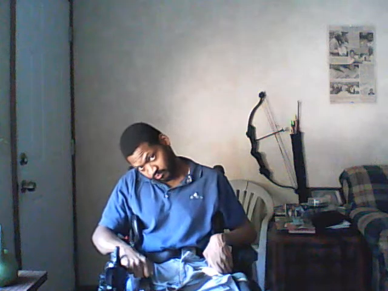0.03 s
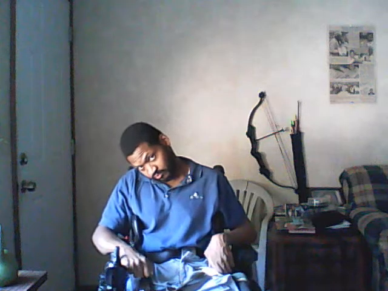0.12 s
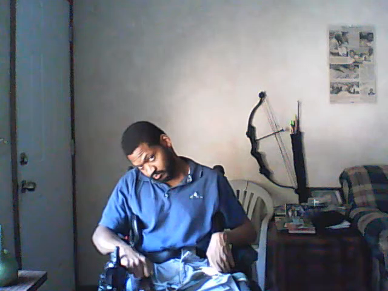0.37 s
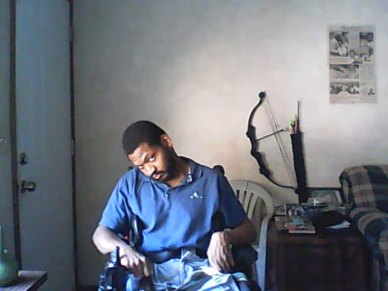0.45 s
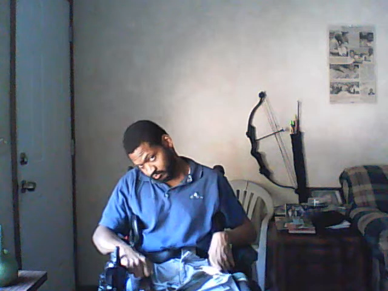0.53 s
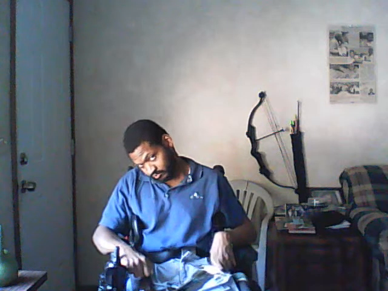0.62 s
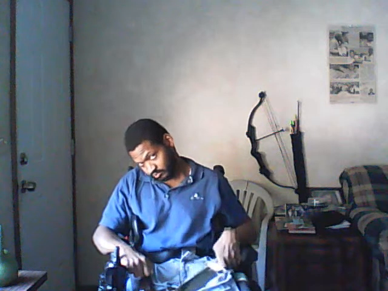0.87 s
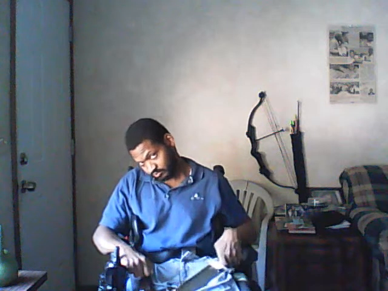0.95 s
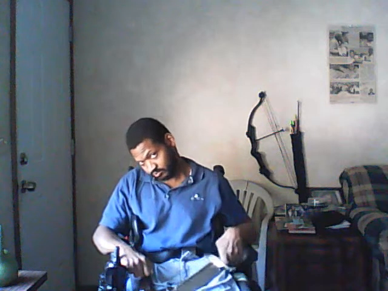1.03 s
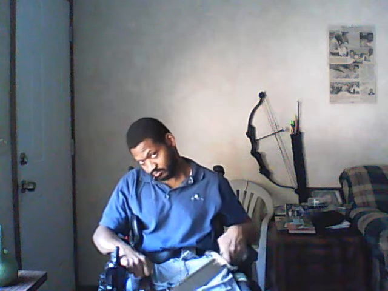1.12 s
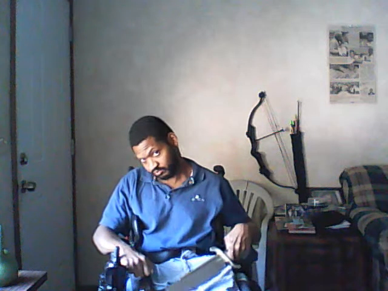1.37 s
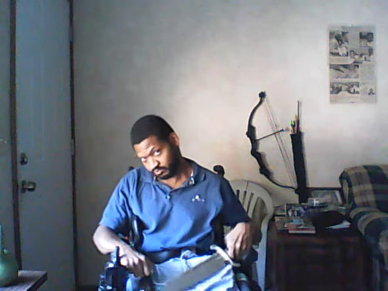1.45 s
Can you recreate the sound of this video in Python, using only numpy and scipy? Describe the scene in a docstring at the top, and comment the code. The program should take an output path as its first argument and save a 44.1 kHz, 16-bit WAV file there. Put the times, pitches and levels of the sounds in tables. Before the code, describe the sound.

Electric wheelchair drive motor sings one short steady whine, then a lower, fainter hum, amid dull bumps

```python
"""A power wheelchair is nudged in a quiet living room, heard on a cheap webcam microphone.
Room air, microphone hiss and thin wavering tones, all shaped noise, lie under everything.
Soft frame thuds (decaying sines) start first and recur over a low rumble of resonant noise.
Then one drive motor sings a near-pure commutator tone that swells and fades, with rumbling gears;
a second motor, made the same way, hums lower and fainter to the end."""
import sys
import numpy as np
from scipy import signal
from scipy.fft import rfft, irfft
from scipy.io import wavfile

SR = 44100
rng = np.random.default_rng(int(sys.argv[2]) if len(sys.argv) > 2 else 0)


def master_out(mix):
    """Clip the mix to full scale and print it as 16-bit PCM to the path in sys.argv[1]."""
    frames = np.transpose(np.atleast_2d(mix))
    ceiling = np.clip(frames, -1, 1)
    pcm = np.round(ceiling * 32767).astype(np.int16)
    wavfile.write(sys.argv[1], SR, pcm)


def makeup_ratio(level_db):
    """Linear amplitude ratio for a level in decibels (20 dB per factor of ten)."""
    decades = np.asarray(level_db, float) / 20
    return 10 ** decades


N = 66150


def unit(x):
    """Scale to rms 1."""
    return x / np.sqrt(np.mean(x ** 2))


def curve(table, column):
    """One column of a table, interpolated over time (column 0, s)."""
    rows = np.array(table, float)
    return np.interp(np.arange(N) / SR, rows[:, 0], rows[:, column])


def walk(rate_hz):
    """Smooth random drift of rms 1: noise low-passed around rate_hz."""
    f_hz = np.fft.rfftfreq(N, 1 / SR)
    spectrum = rfft(rng.standard_normal(N))
    return unit(irfft(spectrum / (1 + (f_hz / rate_hz) ** 2), N))


def coloured(points):
    """Noise of rms 1 with the spectral shape of (f/Hz, level/dB) points, log-f interpolated."""
    f_hz = np.fft.rfftfreq(N, 1 / SR) + 1  # +1 avoids log(0)
    p = np.array(points, float)
    shape_db = np.interp(np.log(f_hz), np.log(p[:, 0]), p[:, 1], left=-120, right=-120)
    return unit(irfft(rfft(rng.standard_normal(N)) * makeup_ratio(shape_db), N))


def resonant(hz, width_hz):
    """Noise of rms 1 through one resonance, -6 dB at hz +/- width_hz / 2."""
    f_hz = np.fft.rfftfreq(N, 1 / SR)
    gain = 1 / (1 + (2 * (f_hz - hz) / width_hz) ** 2)
    return unit(irfft(rfft(rng.standard_normal(N)) * gain, N))


def motor(table):
    """Commutator tone with weak third harmonic, once-a-turn beat partner, and resonant gear noise."""
    # gear noise resonances: f/Hz, width/Hz, level/dB at full load
    gear_modes = [(316, 120, -60), (357, 110, -54.5), (483, 130, -56.5), (602, 78, -62), (828, 50, -74),
                  (1287, 227, -65.5)]
    bars = 8  # commutator bars: tone cycles per turn
    third_db = -48  # re the tone
    pitch_drift, shimmer_db = 0.0015, 0.6  # rms; drift as a fraction of pitch

    t = np.arange(N) / SR
    fade_in = np.clip((t - table[0][0]) / 0.011, 0, 1)
    fade_out = np.clip((table[-1][0] + 0.038 - t) / 0.036, 0, 1)

    tone_hz = curve(table, column=1) * (1 + pitch_drift * walk(15))
    phase = 2 * np.pi * np.cumsum(tone_hz) / SR
    tone_gain = makeup_ratio(curve(table, column=2) + shimmer_db * walk(25))
    tone = tone_gain * (np.sin(phase) + makeup_ratio(third_db) * np.sin(3 * phase))

    # one turn rate above the tone, so the two beat once a turn
    beat_gain = makeup_ratio(curve(table, column=3) + 1.5 * walk(3.7))
    beat = beat_gain * np.sin(phase * (1 + 1 / bars) + 0.34 * walk(24))

    gears = sum(makeup_ratio(db) * resonant(hz, width_hz) for hz, width_hz, db in gear_modes)
    gears = makeup_ratio(curve(table, column=4)) * gears
    return fade_in * fade_out * (np.sqrt(2) * (tone + beat) + gears)  # sqrt(2): sine levels are rms


def frame():
    """Soft pushes ring the frame as decaying sines; low resonant rumble swells and sinks."""
    # frame rumble: t/s, level/dB
    rumble_level = [(0, -64), (0.2, -68), (0.7, -67.5), (0.77, -52), (0.85, -53.5), (0.87, -67.5),
                    (0.98, -57.5), (1.03, -60), (1.08, -52.5), (1.18, -72.5), (1.25, -68), (1.38, -69.5),
                    (1.5, -68)]
    # frame thuds: t/s, envelope peak/dB, ring f/Hz, t60/s
    thud_list = [(0.142, -48.5, 214.6, 0.097), (0.224, -53.5, 169, 0.047), (.365, -54.5, 174, 0.035),
                 (0.395, -48, 159.7, 0.053), (0.491, -54.5, 186, 0.045), (0.598, -43, 266.6, 0.025),
                 (0.687, -40, 201.4, 0.059), (0.841, -45, 278, 0.033), (0.97, -44.5, 172, 0.039),
                 (0.993, -52, 277, 0.013), (1.048, -44.5, 200, 0.015), (1.098, -44.5, 191.2, 0.24),
                 (1.131, -54.5, 191.6, 0.045), (1.362, -47, 222, 0.02), (1.439, -57, 165, 0.054)]
    push_s = 0.0067  # softness of the onset

    t = np.arange(N) / SR
    out = makeup_ratio(curve(rumble_level, column=1) + 2 * walk(30)) * resonant(254, width_hz=88)
    for start_s, peak_db, ring_hz, t60_s in thud_list:
        u = np.maximum(t - start_s, 0)
        onset = 1 - np.exp(-(u / push_s) ** 2)
        decay = np.exp(-np.log(1000) * u / t60_s)
        envelope = onset * decay
        out = out + makeup_ratio(peak_db) * envelope / envelope.max() * np.sin(2 * np.pi * ring_hz * u)
    return out


def background():
    """Room air and microphone hiss as coloured noise; thin wavering tones as narrow noise bands."""
    # room air spectrum: f/Hz, relative density/dB per Hz
    room_spectrum = [(60, -51), (102, -20), (150, -10.5), (275, -12.5), (350, -10), (420, -11),
                     (490, -11.5), (550, -17), (700, -20), (820, -13), (1030, -23), (1200, -16),
                     (1400, -23.5), (1520, -29), (2200, -36.5)]
    # microphone hiss spectrum: f/Hz, relative density/dB per Hz
    hiss_spectrum = [(880, -29), (1500, -9.5), (1710, 4), (1870, -6.5), (2350, -1.5), (3710, -3),
                     (5250, 0.5), (5800, -4), (6150, -10.5), (6500, -37.5), (7200, -37), (7900, -38.5),
                     (8250, -33.5), (11800, -33.5), (12100, -26.5), (15200, -29), (16200, -32)]
    # hiss level over time: t/s, relative level/dB
    hiss_swell = [(0, -2), (.3, 0), (.7, -0.5), (1, -2.5), (1.5, -3)]
    # thin tone centres: f/Hz
    thin_hz = [791, 1337, 2989, 3988, 6200, 7065, 7420, 7974]
    # thin tones, same order: level/dB, width/Hz
    thin_bands = [(-76, 14), (-80, 30), (-91, 10), (-86, 8), (-99, 30), (-97, 30), (-90, 170), (-87.5, 14)]
    room_db, hiss_db = -60, -65

    room = makeup_ratio(room_db + 1.2 * walk(3.7)) * coloured(room_spectrum)
    hiss_gain = makeup_ratio(hiss_db + curve(hiss_swell, column=1) + 0.3 * walk(12))
    hiss = hiss_gain * coloured(hiss_spectrum)
    tones = sum(makeup_ratio(db) * resonant(hz, width_hz)
                for hz, (db, width_hz) in zip(thin_hz, thin_bands))
    return room + hiss + tones


def flicker():
    """Thin treble tones, narrow noise bands, each opening when its own slow drift passes a gate."""
    low_hz, high_hz, width_hz = 5950, 7850, 18
    open_db, gate = -98, 0.9  # level before gating; gate in rms of the drift

    out = np.zeros(N)
    for hz in np.linspace(low_hz, high_hz, 24) + 30 * rng.standard_normal(24):
        opening = np.clip(3 * (walk(2.5) - gate), 0, 1)
        out = out + makeup_ratio(open_db) * resonant(hz, width_hz) * opening
    return out


def scene():
    """Sum of both motors, the frame, the background and the treble flicker, mono."""
    # first motor: t/s, tone f/Hz, tone level/dB, once-a-turn beat level/dB, gear noise level/dB
    first_motor = [(.19, 422.2, -62.5, -76, -23.5), (.222, 425.4, -43.5, -56, -4.5),
                   (.278, 430.7, -40.5, -54, -1), (.33, 438, -37.5, -48.5, -3.5),
                   (.39, 444.4, -35, -63, 0.5), (.43, 449.4, -34, -55.5, -7), (.465, 447.5, -32, -57, 0),
                   (.52, 449.8, -33.5, -60, -5.5), (.565, 448.9, -31, -48.5, 1.5),
                   (.595, 443, -34.5, -63, -1.5), (.62, 445.2, -32.5, -63, -4.5),
                   (.67, 442, -38, -53.5, -3), (.726, 434.7, -45, -54.5, -6), (.78, 429.4, -56.5, -75, -11),
                   (.85, 421.3, -64.5, -75, -18)]
    # second motor: t/s, tone f/Hz, tone level/dB, once-a-turn beat level/dB, gear noise level/dB
    second_motor = [(.9, 410, -70, -85, -24), (.96, 405, -61, -85, -22), (1.04, 393, -64, -85, -22),
                    (1.085, 389, -61, -85, -20), (1.114, 387.4, -52, -80, -18), (1.16, 386, -55, -80, -20),
                    (1.25, 384, -58.5, -80, -24), (1.36, 385, -56.5, -80, -24), (1.5, 385, -56, -80, -24)]
    mix = motor(first_motor) + motor(second_motor) + frame() + background() + flicker()
    return mix[None]


def top_cut(x):
    """Nothing passes above the cut-off."""
    return signal.sosfilt(signal.butter(12, 16320, fs=SR, output="sos"), x)


def record(dry):
    """The microphone loses the deep bass: 6th-order high-pass at 85 Hz."""
    bass_cut = signal.butter(6, 85, "high", fs=SR, output="sos")
    mix = signal.sosfilt(bass_cut, dry)
    return top_cut(mix)


dry = scene()
out = record(dry)
master_out(out)
```